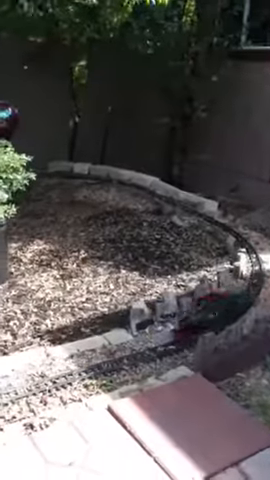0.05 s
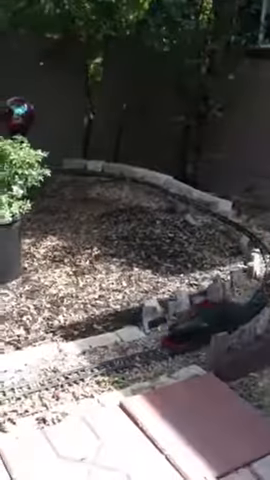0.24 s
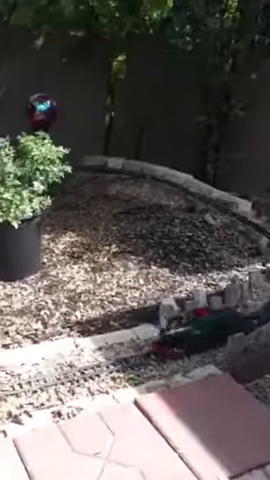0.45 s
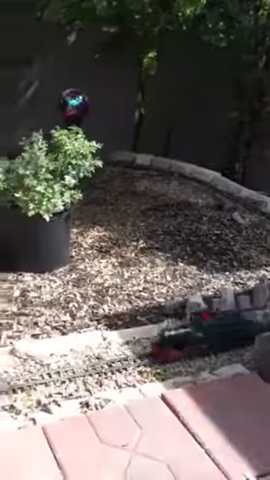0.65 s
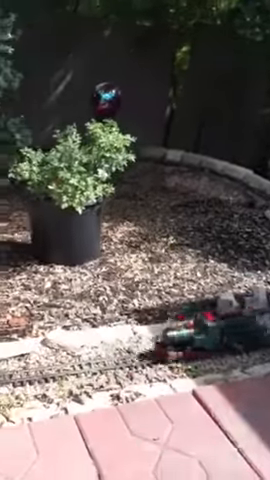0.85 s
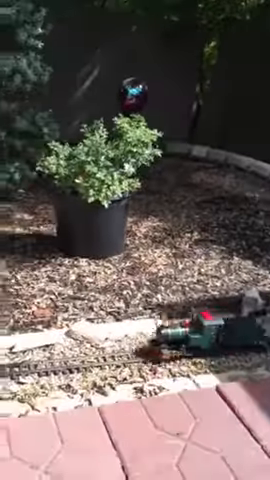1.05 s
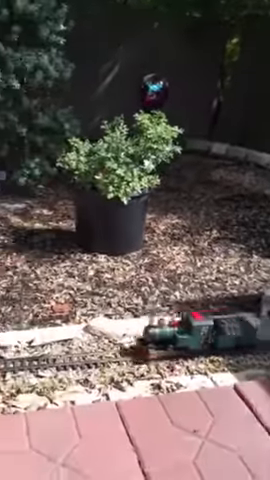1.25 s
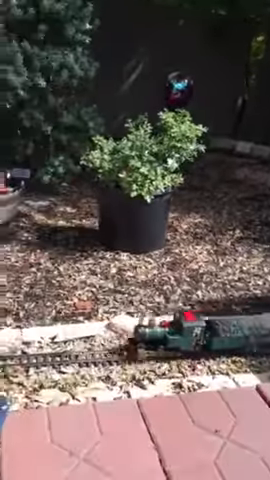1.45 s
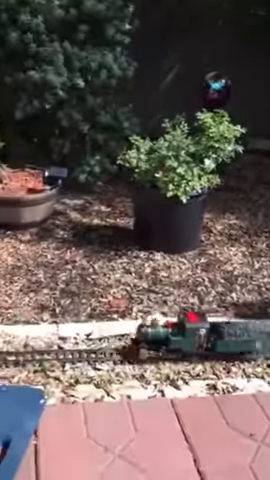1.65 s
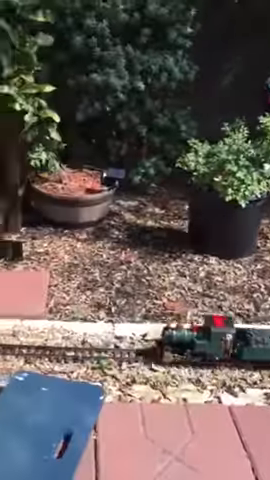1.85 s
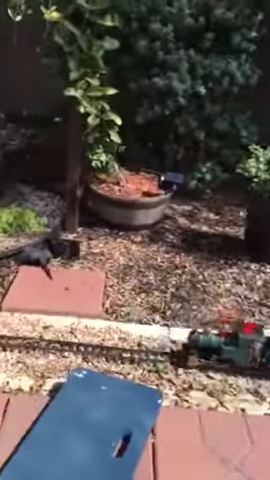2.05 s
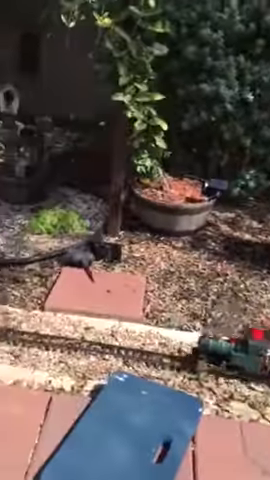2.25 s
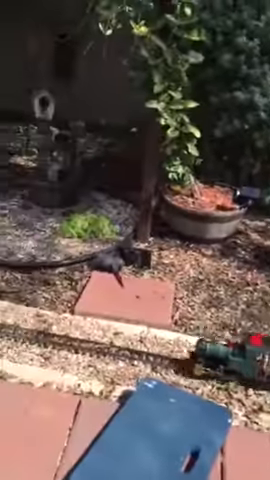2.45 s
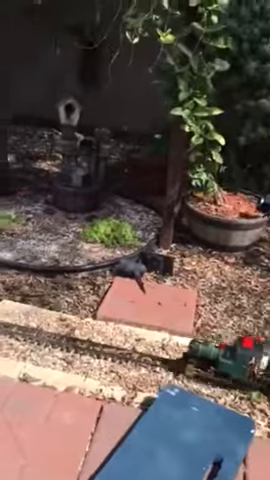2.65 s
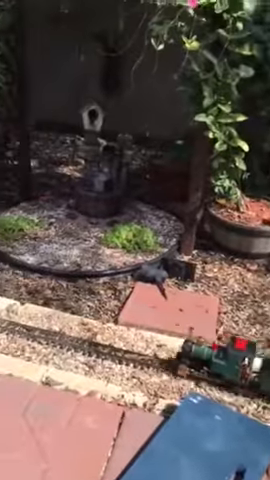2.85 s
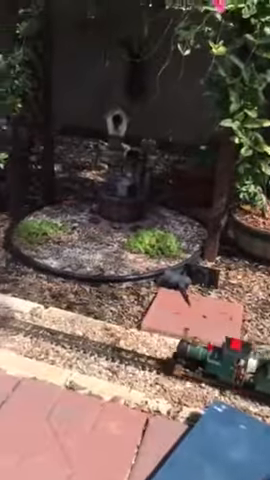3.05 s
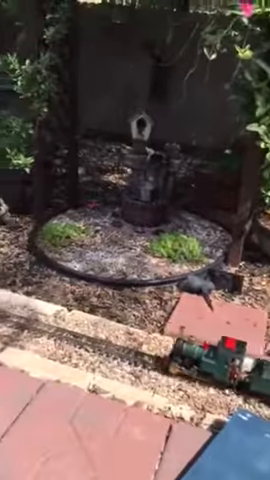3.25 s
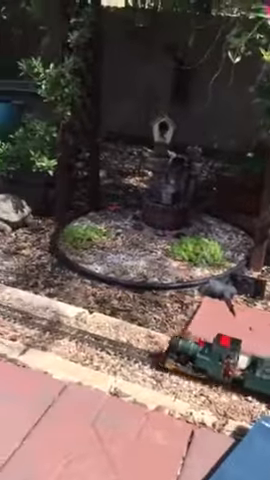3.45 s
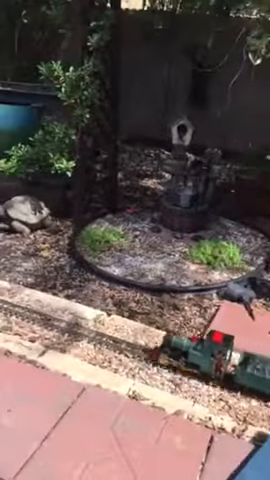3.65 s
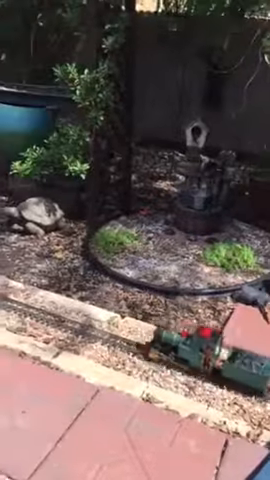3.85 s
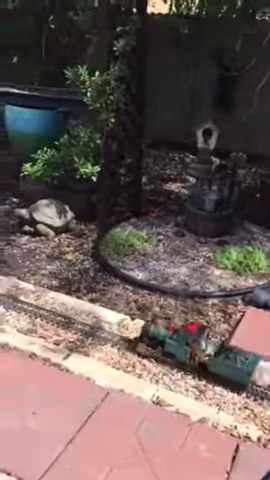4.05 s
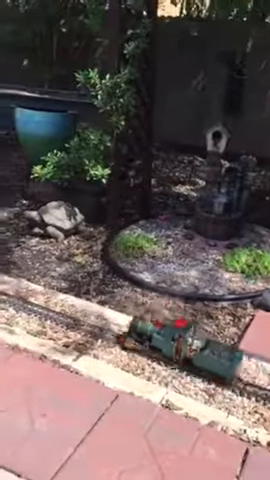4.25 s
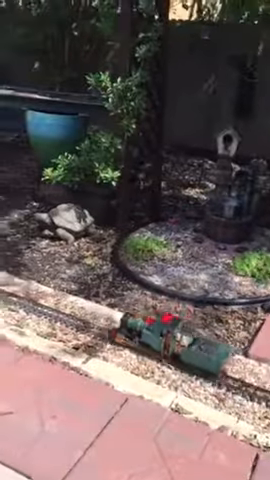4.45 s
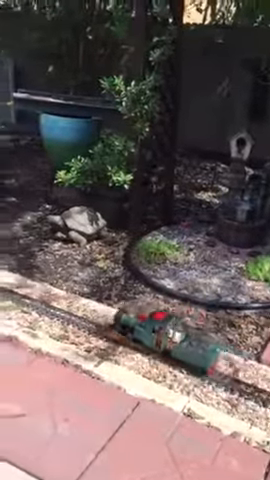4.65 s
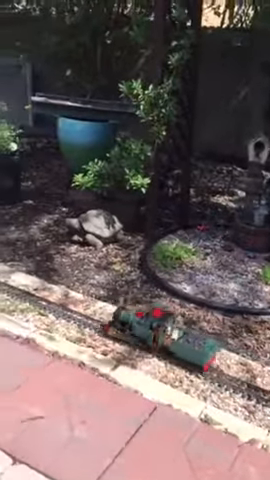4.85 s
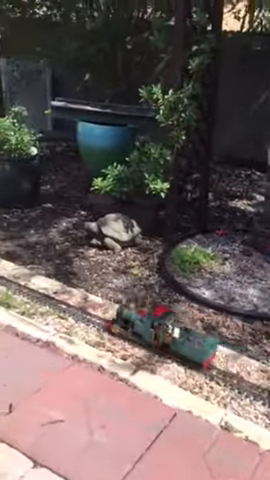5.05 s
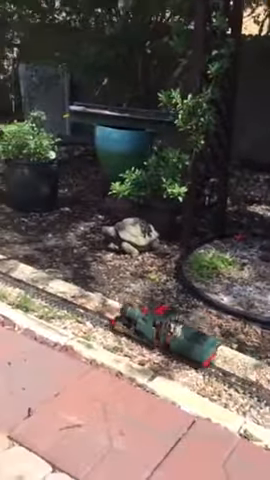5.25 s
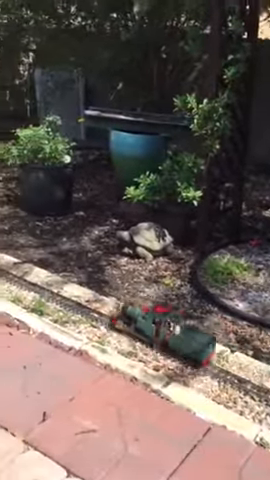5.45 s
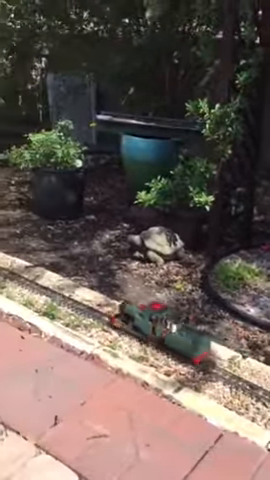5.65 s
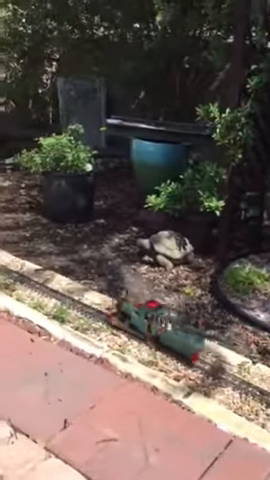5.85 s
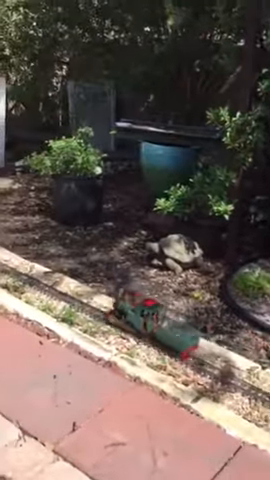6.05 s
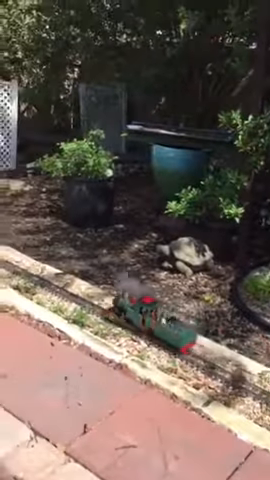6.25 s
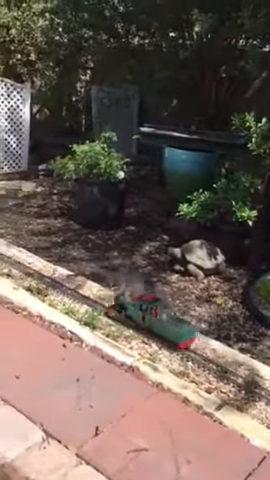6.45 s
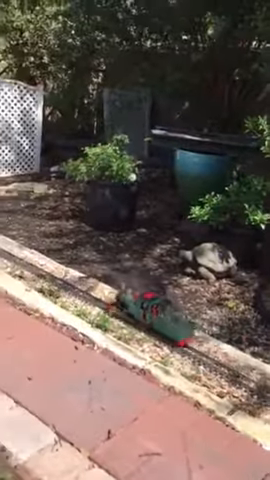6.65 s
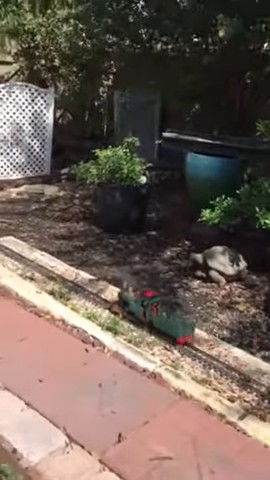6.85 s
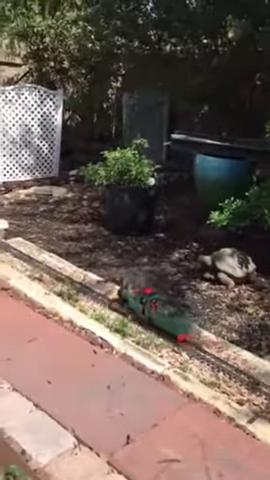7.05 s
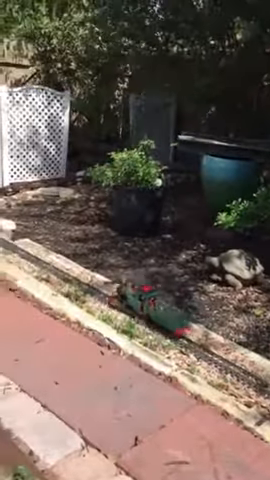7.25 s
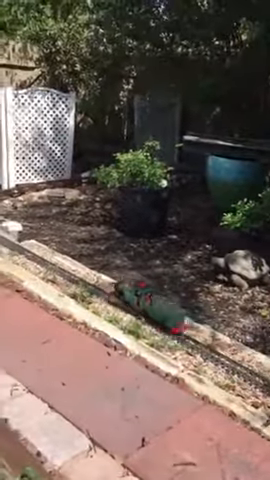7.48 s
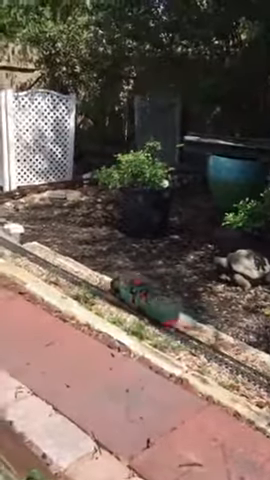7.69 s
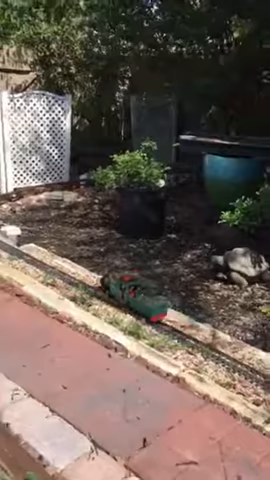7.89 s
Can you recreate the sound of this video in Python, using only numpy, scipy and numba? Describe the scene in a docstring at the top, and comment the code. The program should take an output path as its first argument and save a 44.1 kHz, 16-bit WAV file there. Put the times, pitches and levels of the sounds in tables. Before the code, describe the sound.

A miniature steam locomotive on a garden track spits wet steam in quick little puffs over a sputtering hiss and the soft, hollow roar of its burner. As these fade with distance, its whistle blows two short blasts and a long one, each a steady tone wrapped in bright hiss. A phone microphone a few metres away also catches faint distant rumble and light wind buffets.

```python
"""A suburban garden, one phone microphone a few metres from a small live-steam railway.
Distant rumble and a fan hum lie underneath, and wind buffets the microphone. The locomotive trundles
away: its gas burner roars in the flue's resonances, and steam leaks and spits. The whistle blows
two short blasts and a long one, a pipe tone over the hiss of the jet."""
import sys
import numpy as np
from scipy import signal
from scipy.fft import rfft, irfft
from scipy.io import wavfile
from scipy.ndimage import uniform_filter1d
from numba import njit

SR = 44100
rng = np.random.default_rng(int(sys.argv[2]) if len(sys.argv) > 2 else 0)


def to_wav(sig):
    """Store sig (one row per channel, or 1-D mono) as 16-bit WAV at the path in sys.argv[1].

    Samples outside -1..1 are clipped; the rate is SR.
    """
    pcm = np.clip(np.atleast_2d(sig), -1, 1) * 32767
    pcm = np.round(pcm).astype(np.int16)
    wavfile.write(sys.argv[1], SR, pcm.T)  # frames by channels


N = 349272
T = np.arange(N) / SR

# burner and leak, fading as the engine draws away:
# t/s, first flue mode/dB, second flue mode/dB, ringing leak/dB, sizzle/dB
ENGINE_LEVELS = [(0, -44.5, -54.5, -50, -54), (.42, -41, -53, -47.5, -55), (.55, -41, -52.5, -56.5, -51),
                 (1.1, -39, -55, -49, -54.5), (1.55, -39, -61, -49.5, -62), (1.85, -41.5, -58, -48.5, -56),
                 (2.25, -36.5, -57, -49.5, -54), (2.6, -43.5, -61, -51.5, -55.5),
                 (3.1, -43.5, -52, -51.5, -58), (4, -44, -52, -52, -59), (4.5, -47.5, -54, -54, -62),
                 (4.9, -43, -50.5, -54.5, -63.5), (5.3, -47, -52.5, -53.5, -60),
                 (6.1, -50.5, -54.5, -56.5, -62), (7.6, -57.5, -61.5, -62, -62),
                 (7.92, -50.5, -52, -62, -71)]


def undb(db):
    """dB to gain."""
    return 10 ** (np.asarray(db) / 20)


def unit(x):
    """Scaled to rms 1."""
    return x / np.sqrt(np.mean(x ** 2))


def bump(at_s, half_width_s):
    """A bell-shaped swell of height 1."""
    return np.exp(-((T - at_s) / half_width_s) ** 2)


def curves(table):
    """The columns after t/s, interpolated to every sample."""
    times, *columns = np.transpose(table)
    return [np.interp(T, times, column) for column in columns]


@njit
def bandpass(x, hz, width_hz):
    """State-variable band-pass whose centre may move every sample."""
    y, band_state, low_state = np.empty(len(x)), 0., 0.
    for i in range(len(x)):
        g, damping = np.tan(np.pi * hz[i] / SR), width_hz / hz[i]
        v = (band_state + g * (x[i] - low_state)) / (1 + g * (g + damping))
        band_state, low_state = 2 * v - band_state, low_state + 2 * g * v
        y[i] = damping * v
    return y


def band(hz, width_hz, source=None):
    """One resonance, rms 1, driven by fresh noise unless a source is given."""
    if source is None:
        source = rng.standard_normal(N)
    return unit(bandpass(source, hz + np.zeros(N), float(width_hz)))


def walk(rate_hz):
    """Random levels held 1 / rate_hz seconds and smoothed twice; spread near 1."""
    hold = int(SR / rate_hz)
    steps = np.repeat(rng.standard_normal(N // hold + 1), hold)
    return 1.324 * uniform_filter1d(uniform_filter1d(steps, hold), hold)[:N]


def coloured(spectrum):
    """Noise shaped by (f/Hz, level/dB) points, rms 1."""
    hz, db = np.transpose(spectrum)
    bins_hz = np.fft.rfftfreq(N, 1 / SR) + 1
    gain = undb(np.interp(np.log(bins_hz), np.log(hz), db))
    return unit(irfft(rfft(rng.standard_normal(N)) * gain, N))


def turbulence(modes, flicker_hz):
    """Noise in resonances that each drift and flicker by about 1 dB; rms 1."""
    return unit(sum(undb(db + walk(flicker_hz)) * band(hz * (1 + .0037 * walk(2.03)), width)
                    for hz, width, db in modes))


def garden():
    """Distant rumble, wind buffeting the microphone, a wavering fan hum and a hiss of leaves."""
    # suburban rumble: f/Hz, relative level/dB
    rumble_spectrum = [(25, -30), (45, -6), (100, -1), (170, 1), (260, 2), (430, -6), (800, -1.5),
                       (1100, -17), (1800, -66)]
    # steady wind on the microphone: t/s, level/dB
    breeze = [(0, -49.5), (.7, -55.5), (5.2, -55), (5.5, -48.5), (7.2, -50.5), (7.92, -48.5)]
    # gusts that thump the microphone: t/s, peak level/dB, half-width/s
    gusts = [(.31, -50, .03), (.5, -53, 0.12), (.865, -43, 0.022), (1.488, -48.5, .05), (1.602, -48, 0.025),
             (1.775, -46, 0.018), (2.18, -46.5, .12), (2.42, -50, .04), (2.547, -48, .03), (2.78, -47, .03),
             (3.07, -50, .04), (3.62, -52, 0.13), (4.05, -43.5, .03), (4.747, -52, 0.089),
             (4.952, -54, 0.018)]
    # fan hum: f/Hz, width/Hz, level/dB
    fan_bands = [(117, 5, -59), (235, 6.1, -63)]
    # leaves and far traffic: f/Hz, relative level/dB
    air_spectrum = [(900, -20), (1500, -7), (4000, 1.5), (9000, -15), (15800, -14)]
    rumble = coloured(rumble_spectrum) * undb(-52 + .7 * walk(3))
    wind_gain = undb(curves(breeze)[0]) + sum(undb(db) * bump(s, width) for s, db, width in gusts)
    wind = band(65, 117, source=band(35, 70)) * wind_gain * undb(1.84 * walk(14))
    hum = sum(undb(db) * band(hz, width) for hz, width, db in fan_bands)
    air = undb(-61.5) * coloured(air_spectrum)
    return rumble + wind + hum + air


def burner():
    """The gas flame flutters in the flue's resonances; once the flue sings for a moment."""
    # first and second flue modes: f/Hz, width/Hz
    flue_modes = [(982, 46.3), (1572, 77)]
    # upper modes and broad roar of the flue: f/Hz, width/Hz, relative level/dB
    upper_modes = [(2229, 48, -0.5), (3010, 120, -0.5), (740, 800, 2), (1300, 600, 0.5), (2100, 1300, 0)]
    fade_db_per_s = .68  # the upper roar fades with distance
    note_hz, note_start_s, note_length_s, note_db = 1016, 6.86, .22, -45
    roar = sum(undb(db + 1.53 * walk(25.28)) * band(hz * (1 + .0011 * walk(4.76)), width)
               for db, (hz, width) in zip(curves(ENGINE_LEVELS)[:2], flue_modes))
    upper_roar = undb(-51 - fade_db_per_s * T) * turbulence(upper_modes, flicker_hz=7.9)
    note_progress = np.clip((T - note_start_s) / note_length_s, 0, 1)
    note_swell = np.sqrt(np.sin(np.pi * note_progress).clip(0))
    note = undb(note_db) * note_swell * np.sin(2 * np.pi * note_hz * T)
    return roar + upper_roar + note


def steam_leak():
    """Steam seeps from the glands: a ringing hiss and a broad sizzle that sputter together."""
    # resonances of the leak: f/Hz, width/Hz, relative level/dB
    leak_modes = [(4290, 340, 7), (5490, 120, -1.5), (9040, 610, 1), (10200, 210, -7), (11800, 400, -14)]
    # one thin jet that comes and goes: t/s, f/Hz, level/dB re leak
    thin_jet = [(0, 6900, -6), (1.3, 6800, -14), (1.6, 6860, -9), (2.4, 6830, -7), (2.85, 7340, -8),
                (3.1, 7400, -25), (5, 6960, -20), (7.92, 7200, -11)]
    # broad sizzle: f/Hz, relative level/dB
    sizzle_spectrum = [(2000, -34), (3200, -3.5), (6000, -1), (10000, -6), (13000, -9), (15800, -15)]
    leak_db, sizzle_db = curves(ENGINE_LEVELS)[2:]
    thin_hz, thin_db = curves(thin_jet)
    hiss = turbulence(leak_modes, flicker_hz=5) + undb(thin_db) * band(thin_hz, 400)
    sputter_db = 1.54 * walk(50)
    sizzle = undb(sizzle_db + 1.05 * sputter_db + walk(90)) * coloured(sizzle_spectrum)
    return undb(leak_db + sputter_db) * hiss + sizzle


def spits():
    """Each drop of condensate swells, bursts out as a short ringing puff and dribbles away."""
    # spits of wet steam: t/s, peak level/dB
    drops = [(.0188, -32), (.0483, -38), (.106, -35.5), (.1381, -33.5), (.1845, -33), (.21, -39),
             (.2683, -33), (.3022, -34), (.3461, -32), (.3731, -39), (.4305, -34.5), (.4643, -41),
             (1.2825, -45), (1.3154, -41), (1.3648, -43), (1.3914, -46), (1.4591, -42), (1.4945, -41),
             (1.5465, -39), (1.726, -40), (2.4423, -45), (2.8285, -43), (4.7172, -48), (6.291, -35)]
    # resonances of a puff: f/Hz, width of each pass/Hz, relative level/dB
    puff_modes = [(4320, 640, 3), (9300, 1300, -3), (11650, 660, -18.5), (2100, 670, -8), (6800, 1300, -15),
                  (8000, 16000, -10)]
    rise_s, fall_s, tail_s, tail_db = .0022, .004, .025, -19
    t = np.arange(SR // 10) / SR
    decay = np.exp(-t / fall_s) + undb(tail_db) * np.exp(-t / tail_s)
    puff = decay * (1 - np.exp(-t / rise_s)) ** 2
    envelope = np.zeros(N)
    for s, db in drops:
        start = int((s - rise_s / 2) * SR)
        envelope[start:start + len(t)] += undb(db) * puff / puff.max()
    # each resonance acts twice, so the gaps between them stay dark
    ring = sum(undb(db + 1.4 * walk(30.13)) * band(hz, width, source=band(hz, width))
               for hz, width, db in puff_modes)
    return envelope * unit(ring)


def blast(opens, shuts, warm_hz, overshoot_hz, cold_flat_hz, overtone_rise_s, rush_db, *level_pairs):
    """One opening of the valve: curves of pitch/Hz and of level/dB for three partials and the jet."""
    # the pipe falters: t/s, fundamental dip/dB, overtone dip/dB
    falters = [(5.71, 0.5, 5), (6.28, 3, 2), (6.6, 2.5, 4), (6.745, 2, 16), (7.36, 1.5, 5)]
    tone_attack_s, jet_attack_s, rush_s, falter_s = .014, .017, .063, .017
    tone_fall, overtone_fall, jet_fall = 640, 1300, 537  # dB/s just as the valve shuts
    linger_s = .056  # the fall slows as the garden echoes it
    since_open = np.maximum(T - opens, 1e-6)
    since_shut = np.maximum(T - shuts, 0)
    release = since_shut / np.sqrt(1 + since_shut / linger_s)

    def rise_db(length_s, power):
        """Attack that grows as a power of time, then holds at 0 dB."""
        return 20 * power * np.log10(np.minimum(since_open / length_s, 1))

    hz = warm_hz - 60 * np.exp(-since_open / .016)  # the pitch climbs with the pressure
    hz += overshoot_hz * bump(opens + .045, .04)
    hz -= cold_flat_hz * np.exp(-since_open / .2)  # the cold pipe warms up to pitch
    tone_db, second_db, third_db, jet_db = (np.interp(T, (opens, shuts), pair)
                                            for pair in np.reshape(level_pairs, (-1, 2)))
    tone_db += rush_db * bump(opens, rush_s)  # the first rush of steam lifts or chokes the tone
    tone_loss_db = tone_fall * release + sum(dip * bump(s, falter_s) for s, dip, _ in falters)
    overtone_loss_db = overtone_fall * release + sum(dip * bump(s, falter_s) for s, _, dip in falters)
    tone_db += rise_db(tone_attack_s, power=2) - tone_loss_db
    second_db += rise_db(overtone_rise_s / 2, power=2) - overtone_loss_db
    third_db += rise_db(overtone_rise_s, power=4) - overtone_loss_db
    jet_db += rise_db(jet_attack_s, power=1) - jet_fall * release
    return np.array([hz, tone_db, second_db, third_db, jet_db])


def whistle():
    """The jet drives the pipe: partials locked to an unsteady pitch, breath in its modes, broad hiss."""
    # one row a blast: valve opens/s, shuts/s, warm pitch/Hz, overshoot/Hz, flat while cold/Hz,
    # overtone rise/s, first rush/dB, then start and end level/dB for partials 1, 2, 3 and the jet
    blasts = [(4.042, 4.372, 603.4, 50, 22, 0.073, -5, -29, -30.5, -48, -63, -37.5, -40, -28, -30.5),
              (5.540, 5.879, 606, 12.02, 20.4, .024, 0, -31, -33, -49, -55, -40, -40.5, -30.5, -30.5),
              (6.176, 7.526, 604.2, 4.04, 1.92, .016, 5, -36.5, -35, -44, -50, -39.5, -43.5, -30.5, -32.5)]
    # pipe modes that carry breath: multiples of the pitch
    mode_numbers = [1, 2, 3, 4, 5, 6, 7, 9, 10, 11, 12, 16]
    # breath in those modes: width/Hz, level/dB re jet
    breath_modes = [(69.5, -19.5), (78, -32), (110, -18), (60, -28), (70, -26.5), (55, -19), (60, -19.5),
                    (120, -20), (92.593, -14), (120, -14), (90, -16.5), (100, -20)]
    # jet colour in each blast as the engine turns its tail to the microphone: f/Hz, relative level/dB
    jet_spectra = [
        [(300, -22), (1400, -14.5), (2700, -16), (4100, -7), (5000, -10.5), (5400, 3), (6100, -2.5), (6600, -6),
         (7100, -7.5), (9500, -8), (10500, -12.5), (11500, -7.5), (13900, -4.5), (15800, -10.5)],
        [(300, -22), (1400, -12.5), (2700, -18), (3600, -8), (5050, -11), (5500, -2.5), (5950, 1), (6800, -8.5),
         (7900, -6), (9600, -7.5), (10450, -9.5), (12800, -8), (13700, -7), (15800, -9)],
        [(300, -27), (1400, -11), (2750, -18.5), (3600, -6), (5000, -10.5), (5800, -1.5), (6600, -2),
         (7400, -1), (8000, -5), (9600, -6), (10500, -7.5), (12800, -8), (14000, -3), (15800, -10.5)],
    ]
    current = sum(T > opens for opens, *_ in blasts[1:])
    hz, tone_db, second_db, third_db, jet_db = np.choose(current, [blast(*row) for row in blasts])
    hz = hz * (1 + .005 * walk(90) + .0012 * walk(25))
    phase = 2 * np.pi * np.cumsum(hz) / SR
    # turbulence shakes the upper partials far more than the first
    partials_db = [tone_db + .63 * walk(60) + .3 * walk(250),
                   second_db + 2.4 * walk(50),
                   third_db + 1.4 * walk(60),
                   third_db - 13 + 2 * walk(50),
                   third_db - 15.5 + 2 * walk(50)]
    tone = sum(np.sqrt(2) * undb(db) * np.sin(k * phase) for k, db in enumerate(partials_db, 1))
    breath = sum(undb(db + 1.2 * walk(25)) * band(k * hz, width)
                 for k, (width, db) in zip(mode_numbers, breath_modes))
    hiss = np.choose(current, [coloured(spectrum) for spectrum in jet_spectra])
    hiss *= 1 + .14 * np.sin(phase)  # the jet flaps across the lip once a cycle
    hiss *= undb(.32 * walk(40) + .47 * walk(150))  # wet steam splutters
    return tone + undb(jet_db) * (hiss + breath)


def scene():
    """Engine and garden at one microphone, which feeds both channels."""
    return np.tile(whistle() + burner() + steam_leak() + spits() + garden(), (2, 1))


def record(dry):
    """The phone cuts the deepest bass and the top."""
    bottom_hz, top_hz = 38, 15760
    low_cut = signal.butter(4, bottom_hz, "high", fs=SR, output="sos")
    high_cut = signal.ellip(12, .2, 80, top_hz, fs=SR, output="sos")
    return signal.sosfilt(high_cut, signal.sosfilt(low_cut, dry))


dry = scene()
out = record(dry)
to_wav(out)
```